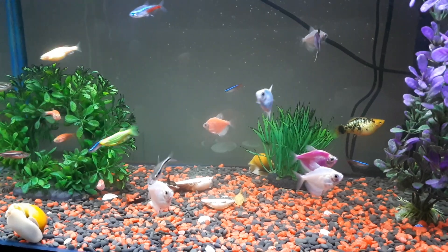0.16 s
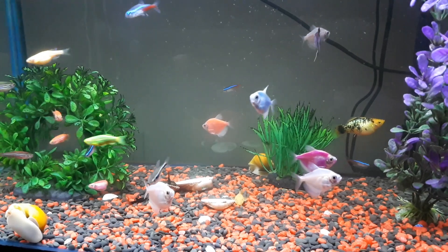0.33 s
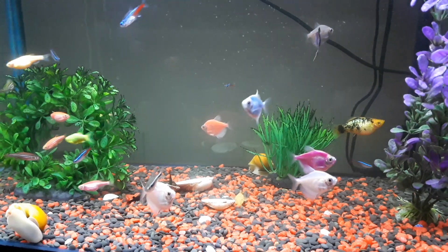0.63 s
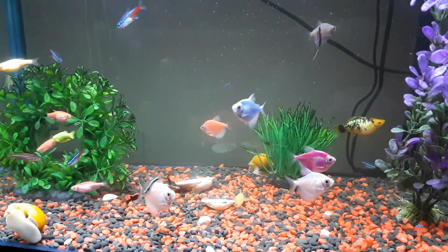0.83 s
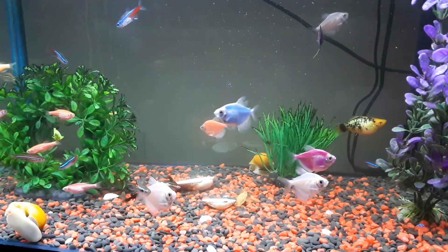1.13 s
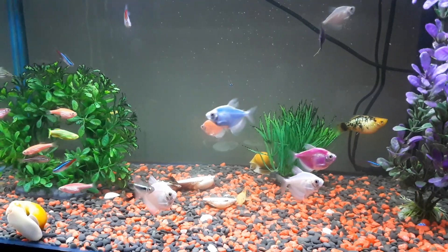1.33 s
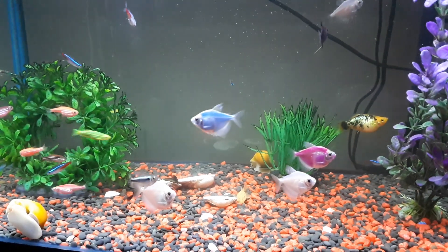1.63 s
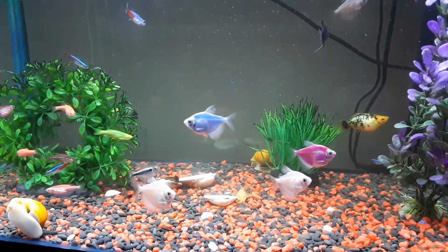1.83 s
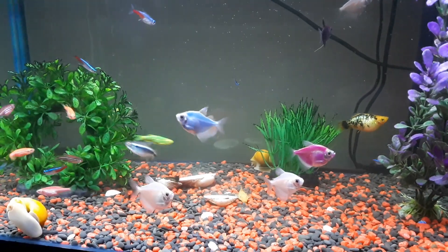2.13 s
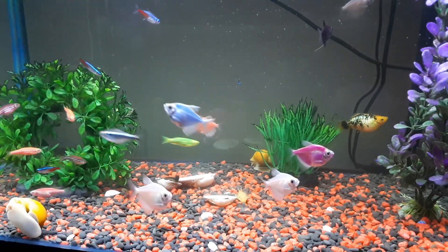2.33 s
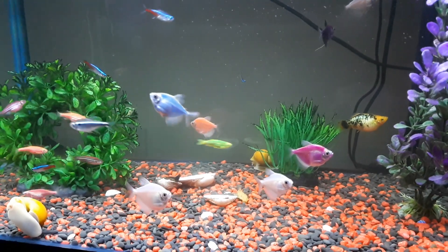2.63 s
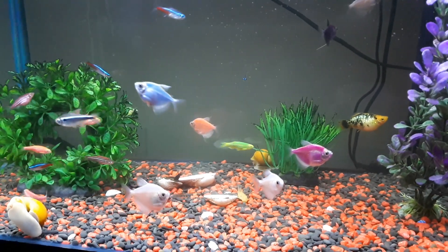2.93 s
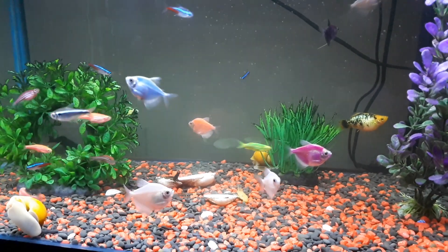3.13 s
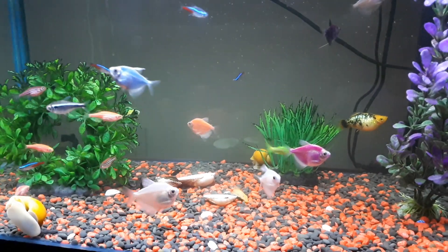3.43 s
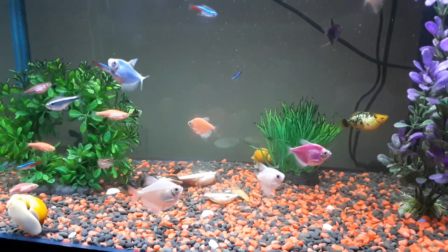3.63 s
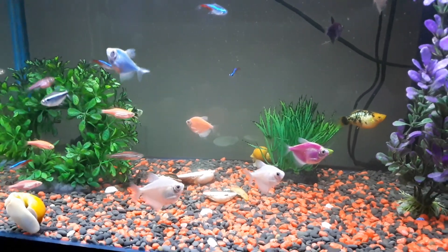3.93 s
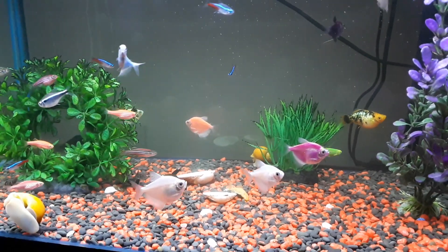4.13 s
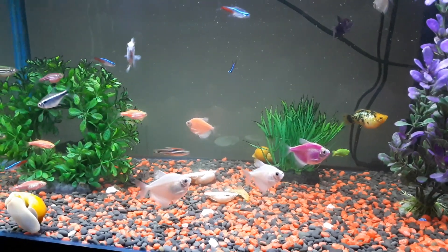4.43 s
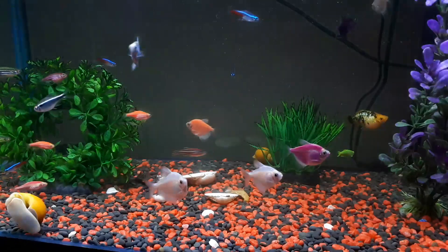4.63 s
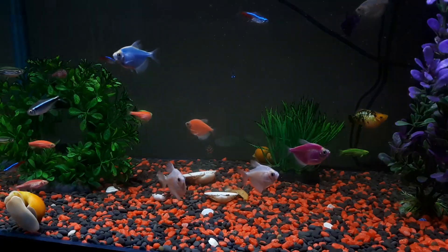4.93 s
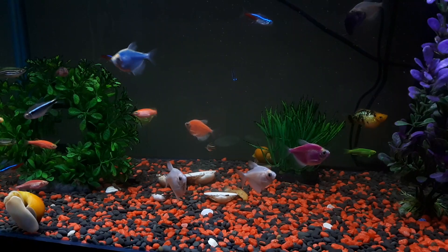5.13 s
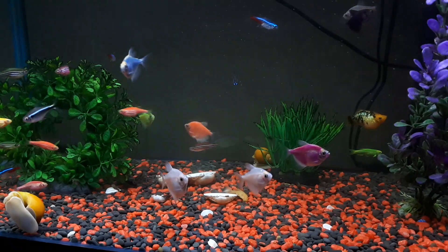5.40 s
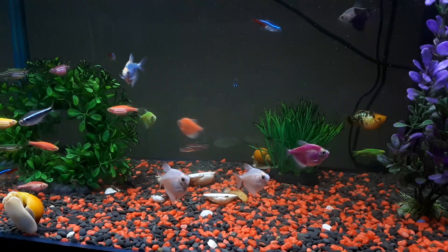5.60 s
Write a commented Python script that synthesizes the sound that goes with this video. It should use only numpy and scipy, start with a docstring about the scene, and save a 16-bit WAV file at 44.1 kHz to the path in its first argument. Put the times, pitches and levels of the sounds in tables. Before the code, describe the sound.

An aquarium pump hums steadily on one low note in a quiet room, over a soft rumble of moving water. Off to the right of the stereo microphones, a faint stream of air bubbles fizzes at the surface, and single bubbles pop with tiny plinks at different pitches. In the second half come a few soft, dull bumps while the hum carries on unchanged.

```python
"""An aquarium pump hums on one low note in a quiet room, over the soft rumble of the water it moves.
Off to the right of a stereo pair of microphones, a stream of air bubbles fizzes at the surface,
heard mostly as reflections from the glass and the walls. The stream falters three times, and single
bubbles pop out of it, each ringing at its own pitch. Late on come a few faint, dull bumps."""
import sys
import numpy as np
from scipy import signal
from scipy.fft import rfft, irfft
from scipy.io import wavfile

SR = 44100
rng = np.random.default_rng(int(sys.argv[2]) if len(sys.argv) > 2 else 0)


def digitize_waveform(pressure):
    """Quantize a signal to 16-bit integers and store it at the path in sys.argv[1].

    Rows of a 2-D input are taken as channels; values are limited to [-1, 1].
    """
    field = np.atleast_2d(pressure).T
    bounded = np.clip(field, -1, 1)
    quanta = np.round(bounded * 32767).astype(np.int16)
    wavfile.write(sys.argv[1], SR, quanta)


N = 254016
TIME = np.arange(N) / SR
UNIT_DENSITY = np.sqrt(SR / 2)   # white noise of this rms has 0 dB per Hz


def from_db(db):
    """Decibels to gain."""
    return 10 ** (np.asarray(db) / 20)


def decay(t, t60_s):
    """An envelope that falls by 60 dB in t60_s."""
    return np.exp(-np.log(1000) * t / t60_s)


def at_hz(points, hz):
    """Read a table along a log-frequency axis."""
    known_hz, values = np.transpose(points)
    return np.interp(np.log(hz + 1), np.log(known_hz), values)


def coloured(x, spectrum):
    """Filter by a table of frequency_hz, gain_db."""
    hz = np.arange(N + 1) * SR / (2 * N)
    return irfft(rfft(x, 2 * N) * from_db(at_hz(spectrum, hz)))[..., :N]


def band(x, low_hz, high_hz):
    """Causal band-pass."""
    edges_hz = np.clip([low_hz, high_hz], 10, .47 * SR)
    return signal.sosfilt(signal.butter(2, edges_hz, "band", fs=SR, output="sos"), x)


def resonate(x, hz, q):
    """Band-pass about hz with a width of hz / q."""
    half = 1 / (2 * q)
    middle = np.hypot(1, half)
    return band(x, hz * (middle - half), hz * (middle + half))


def add(out, start_s, sound):
    """Mix a sound in from start_s."""
    length = out.shape[-1]
    start = min(max(round(start_s * SR), 0), length - 1)
    out[..., start:start + sound.shape[-1]] += sound[..., :length - start]


def panned(x, left_db):
    """Mono to stereo with the left side louder by left_db."""
    return x * from_db(np.array([[left_db], [-left_db]]) / 2)


def pump():
    """Steady, pure tones carried by the tank and its stand, a little left of centre."""
    # the pump's note and its faint companions: pitch_hz, level_db
    hum = [(200.17, -49.9), (389.7, -77.5), (153.3, -85.5), (385, -86.5)]
    tones = sum(from_db(db) * np.sqrt(2) * np.sin(2 * np.pi * (hz * TIME + rng.random()))
                for hz, db in hum)
    return panned(tones, left_db=2.5)


def pops(gain_db=-1.06, snap_db=-15, snap_q=0.91, follower_s=0.014, follower_db=-6):
    """Each bubble snaps open, rings briefly and echoes from its own spot; a weaker one follows."""
    # bubbles that stand out (high q plinks, low q splashes): start_s, level_db, pitch_hz, sharpness_q
    bubbles = [(0.029, -91.5, 2750, 1.7), (0.031, -100, 9800, 1.3), (0.033, -91.5, 2030, 17),
               (0.039, -93, 1046, 15), (0.046, -79.5, 2440, 9.8), (0.127, -97.5, 10500, 1.9),
               (0.129, -94, 3600, 2.1), (0.242, -97, 9100, 2.3), (0.243, -86.5, 2610, 7.4),
               (0.398, -92, 9100, 4.5), (0.497, -99, 11400, 0.87), (0.649, -89.5, 3760, 5.6),
               (0.798, -91.5, 5870, 2), (0.822, -95.5, 6360, 1.7), (0.892, -92.5, 2530, 7.3),
               (0.948, -100, 6700, 7.3), (1.036, -87.5, 1044, 15), (1.045, -99.5, 9900, 0.37),
               (1.044, -91, 2240, 2.3), (1.162, -81.5, 5760, 7.6), (1.26, -84.5, 2700, 7.6),
               (1.266, -87.5, 3310, 6.5), (1.386, -91, 4460, 12), (1.472, -89.5, 3600, 2.9),
               (1.681, -93, 4460, 9.4), (1.898, -99, 7100, 8.4), (1.984, -91, 3590, 3.1),
               (2.16, -94, 4070, 4.2), (2.243, -93, 14500, 2.9), (2.278, -90.5, 2650, 8.4),
               (2.295, -94, 3720, 1.2), (2.336, -79.5, 1960, 9.2), (2.613, -89.5, 3080, 8.3),
               (2.635, -85.5, 3280, 3.3), (2.641, -78.5, 1940, 5.2), (2.774, -91, 1600, 5.5),
               (2.934, -90.5, 12200, 1.9), (3.095, -94, 4340, 6.9), (3.126, -83.5, 1595, 20),
               (3.251, -97.5, 8400, 1), (3.347, -87.5, 1760, 6.6), (3.367, -93, 3400, 3),
               (3.442, -85, 2280, 6.9), (3.538, -92, 3200, 6.5), (3.538, -91, 914, 9.8),
               (3.659, -89.5, 4030, 11), (3.808, -87, 3900, 11.7), (4.059, -92, 990, 2.7),
               (4.138, -90, 2030, 3.8), (4.242, -88.5, 1580, 7.5), (4.319, -89, 5600, 5.3),
               (4.528, -89.5, 6160, 5.7), (4.573, -90, 2540, 5), (4.631, -90, 2160, 0.68),
               (4.632, -94.5, 8900, 1.1), (4.973, -91.5, 2520, 9.7), (5.077, -83.5, 1070, 13),
               (5.087, -98, 12800, 2.9), (5.493, -80.5, 2180, 6.6), (5.549, -89.5, 3280, 4.8)]
    out = np.zeros((2, N))
    for start_s, level_db, pitch_hz, q in bubbles:
        echo = reflections()
        add(echo, follower_s * rng.uniform(.5, 1.5), from_db(follower_db) * reflections())
        ring = resonate(echo, pitch_hz, max(q, .5))
        snap = from_db(snap_db) * resonate(echo, pitch_hz, snap_q)
        add(out, start_s, from_db(level_db + gain_db) * UNIT_DENSITY * (ring + snap))
    return out


def fizz():
    """Small bubbles of every size follow one stream, the finest most strongly, and share one echo."""
    # bubble sizes, coarse to fine: low_hz, high_hz, pops_per_s, sharpness_q, level_db, db_per_vigour_db
    sizes = [(875, 1210, 50, 10, -110, 0.5), (1200, 3586, 200, 8, -108.5, 0.7),
             (3640, 4860, 160, 7, -102.5, 1.46), (5410, 8200, 130, 5, -104.5, 0.57),
             (8900, 16000, 170, 6, -110.5, 1.7)]
    stream_db = vigour_db()
    surface = np.zeros(N)
    for low_hz, high_hz, pops_per_s, q, level_db, follows in sizes:
        gain = from_db(level_db + follows * stream_db + sputter_db())
        surface += gain * swarm(low_hz, high_hz, pops_per_s, q)
    room = reflections()
    room /= np.sqrt(np.sum(room ** 2, axis=1, keepdims=True))
    return signal.fftconvolve(surface[None], room, axes=1)[:, :N]


def swarm(low_hz, high_hz, pops_per_s, q, spread_db=5.0):
    """Tiny bubbles burst at random and with uneven strength, each ringing at one of a row of pitches."""
    pitches = max(round(q * np.log(high_hz / low_hz)), 1)
    edges_hz = np.geomspace(low_hz, high_hz, pitches + 1)
    out = np.zeros(N)
    for low, high in zip(edges_hz, edges_hz[1:]):
        bursts = rng.random(N) < pops_per_s / pitches / SR
        clicks = bursts * from_db(spread_db * np.clip(rng.standard_normal(N), -2, 2))
        out += band(clicks / (np.std(clicks) + 1e-12) + 1e-18, low, high)
    return UNIT_DENSITY * out


def vigour_db():
    """The bubble stream swells and ebbs slowly about its mean, and sags in each lull."""
    # slow course of the stream's vigour: time_s, level_db
    stream = [(0.1, -71), (2.54, -69.5), (3.21, -70.5), (3.47, -68.5), (4.08, -68.5), (4.62, -68.5),
              (4.89, -68), (5.6, -67)]
    # brief lulls in that vigour: middle_s, half_length_s, depth_db
    lulls = [(2.42, 0.071, 4), (3.04, 0.093, 4.5), (4.998, 0.061, 7)]
    slow_db = np.interp(TIME, *np.transpose(stream))
    sag_db = sum(depth_db * np.exp(-((TIME - middle_s) / half_s) ** 2)
                 for middle_s, half_s, depth_db in lulls)
    return slow_db - slow_db.mean() - sag_db


def sputter_db(spread_db=1.5, steps_per_s=14):
    """The stream spurts and slackens by chance, a few times a second."""
    steps = np.clip(rng.standard_normal(1000), -2, 2)
    return spread_db * np.interp(TIME * steps_per_s, np.arange(len(steps)), steps)


def reflections(room_t60_s=0.28, glass_t60_s=0.053, glass_db=-11, build_up_s=0.0036, dense_after_s=.03):
    """Stereo echo of one click: quick, sparse reflections off the glass thicken into the room's tail."""
    t = TIME[:SR // 2]
    density = np.minimum(.08 + (t / dense_after_s) ** 2, 1)   # share of samples that hold an echo
    echoes = rng.standard_normal((2, len(t))) / np.sqrt(density)
    echoes *= rng.random((2, len(t))) < density
    onset = 1 - np.exp(-t / build_up_s)
    tail = decay(t, room_t60_s) + from_db(glass_db) * decay(t, glass_t60_s)
    return echoes * onset * tail


def tank(surface):
    """The air above the water resonates, and the path to each microphone colours the bubbles its own way."""
    # resonances of the air space: pitch_hz, width_hz, gain_db
    modes = [(976, 82, 6.5), (1723, 32, 3), (1923, 10, 7.5), (2030, 6.7, 2), (2055, 17, 8.5),
             (2877, 57, 7.5), (4290, 76, -2.5), (4606, 24, 2.5), (6210, 45, 4), (7150, 42, 9.5),
             (14800, 470, 7.5)]
    # paths from the surface to the left and right microphones: frequency_hz, gain_db
    left_path = [(900, -5), (2000, -5), (2700, 1.5), (3500, -7), (4400, -7), (5000, -8), (5800, -16),
                 (6450, -2), (7000, -5.5), (7600, -38), (9000, -25), (15000, -23)]
    right_path = [(900, -6.5), (2000, -2), (3400, 3), (3900, 4.5), (4350, 14.5), (4850, 2), (5600, -5),
                  (6000, -5.5), (6350, 10), (7200, 8.5), (7700, 6), (8200, -6.5), (11000, 0), (15700, -5)]
    rings = np.zeros_like(surface)
    for pitch_hz, width_hz, gain_db in modes:
        peak = signal.iirpeak(pitch_hz, pitch_hz / width_hz, fs=SR)
        rings += (from_db(gain_db) - 1) * signal.lfilter(*peak, surface)
    left, right = surface + rings
    return np.array([coloured(left, left_path), coloured(right, right_path)])


def bumps(knock_hz=269, q=2.17):
    """A short shudder sounds a low thud and, above it, a hollow knock at a pitch all bumps share."""
    # dull bumps: start_s, thud_peak_db, thud_hz, shudder_t60_s, knock_peak_db
    knocks = [(3.382, -60, 75.4, 0.11, -69), (3.907, -45.5, 96, 0.048, -54),
              (4.072, -46.5, 105, 0.11, -49.5), (4.141, -55, 92, 0.16, -50.5), (4.192, -56, 80, 0.12, -54),
              (4.576, -59.5, 88, 0.14, -67), (4.638, -65, 100, 0.27, -53.5), (5.723, -57, 67.5, 0.21, -61)]
    out = np.zeros((2, N))
    t = TIME[:SR // 2]
    for start_s, thud_db, thud_hz, t60_s, knock_db in knocks:
        # half common to both microphones, half each one's own
        shudder = rng.standard_normal(len(t)) + rng.standard_normal((2, len(t)))
        shudder *= decay(t, t60_s)
        for peak_db, hz in (thud_db, thud_hz), (knock_db, knock_hz):
            note = resonate(shudder, hz, q)
            add(out, start_s, from_db(peak_db) * note / np.abs(note).max())
    return out


def rumble():
    """Moving water and room tone: largely shared by both microphones in the bass, diffuse above."""
    # flow rumble sinking into the hiss of the room: frequency_hz, level_db
    spectrum = [(34, -112), (48, -94.5), (100, -92.5), (152, -90.5), (176, -83), (195, -76.5), (222, -89),
                (295, -93), (325, -100.5), (368, -91.5), (425, -105), (750, -110), (4500, -118.5),
                (15000, -117)]
    # how alike the two microphones hear it: frequency_hz, likeness_0_to_1
    likeness = [(40, 1), (70, 0.1), (130, 0.73), (290, 0.64), (640, 0.1), (1400, 0.04), (3000, 0)]
    mid, side = rfft(rng.standard_normal((2, N)))
    alike = at_hz(likeness, np.arange(len(mid)) * SR / N)
    common = np.sqrt((1 + alike) / 2) * mid
    opposed = np.sqrt((1 - alike) / 2) * side * [[1], [-1]]
    noise = UNIT_DENSITY * irfft(common + opposed, N)
    return panned(coloured(noise, spectrum), left_db=1.0)


def scene():
    """Pump, flow, bubbles and bumps as they reach the two microphones."""
    return pump() + rumble() + tank(pops() + fizz()) + bumps()


def record(dry):
    """The recorder cuts the highest treble steeply."""
    cutoff_hz = 15750
    return signal.sosfilt(signal.ellip(12, .1, 80, cutoff_hz, fs=SR, output="sos"), dry)


dry = scene()
out = record(dry)
digitize_waveform(out)
```